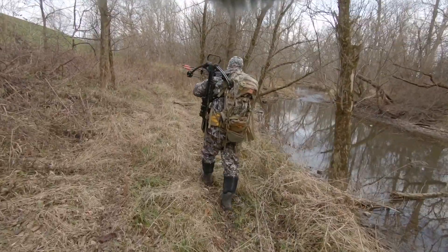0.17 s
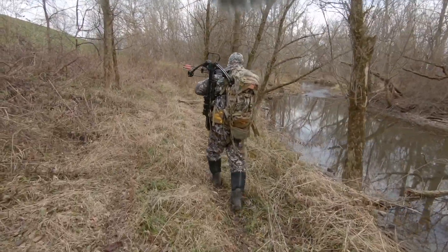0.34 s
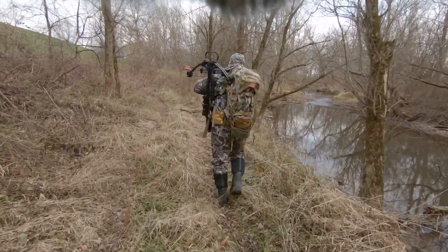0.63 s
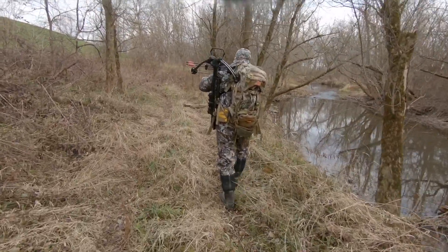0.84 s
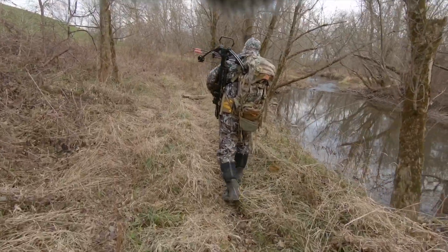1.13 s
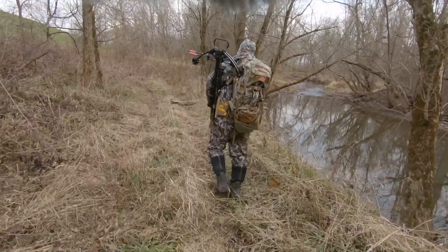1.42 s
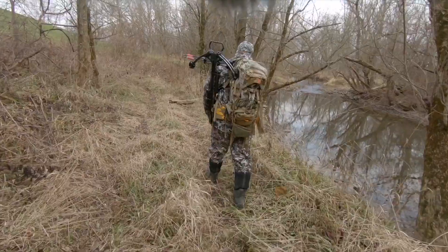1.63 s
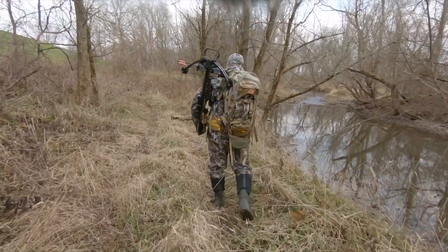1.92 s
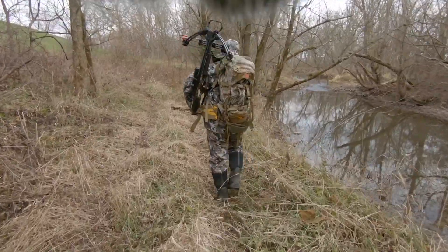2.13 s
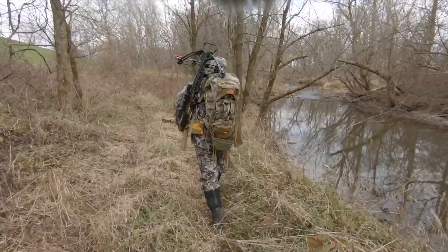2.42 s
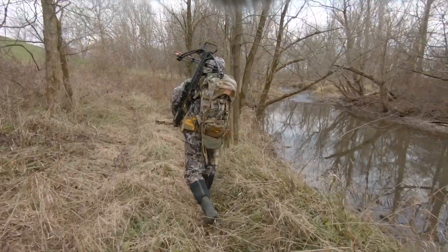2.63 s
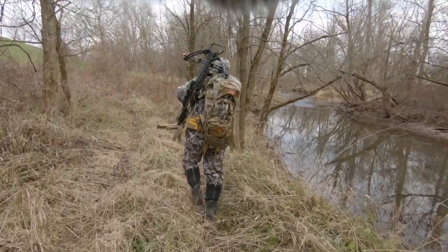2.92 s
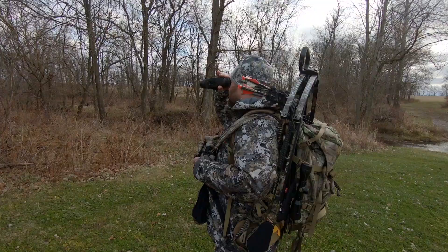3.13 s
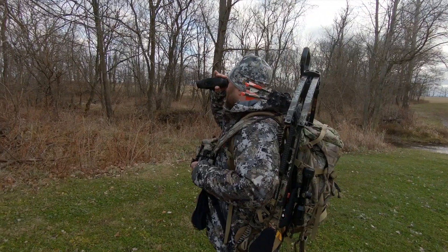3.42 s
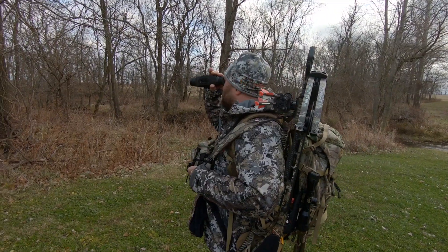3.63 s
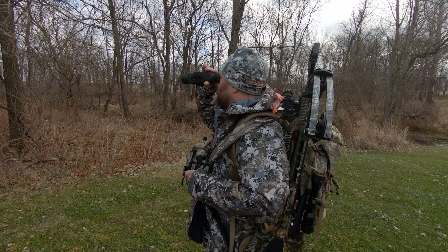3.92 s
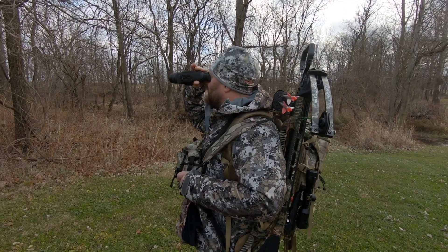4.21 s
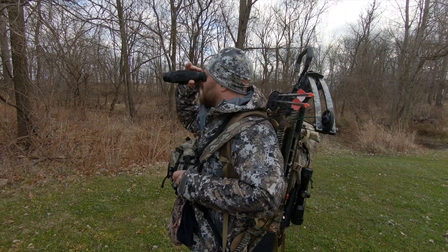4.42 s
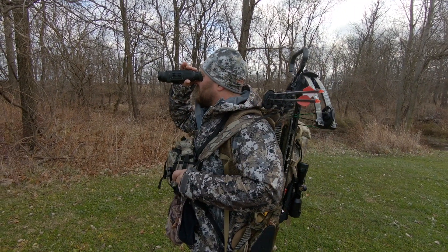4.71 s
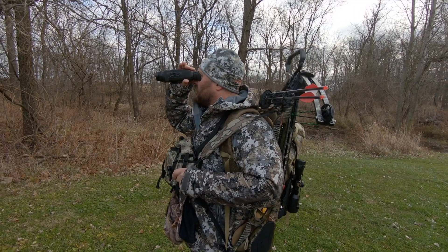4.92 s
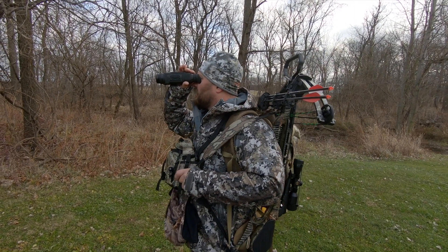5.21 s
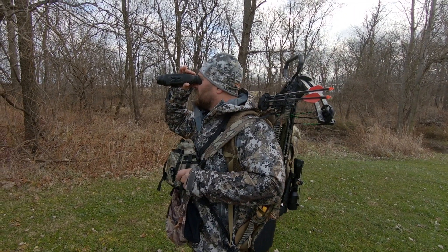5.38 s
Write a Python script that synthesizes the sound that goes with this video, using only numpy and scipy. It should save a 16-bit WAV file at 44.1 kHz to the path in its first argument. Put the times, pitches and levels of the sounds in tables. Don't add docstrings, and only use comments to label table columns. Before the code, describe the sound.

Boots crunch and swish unevenly through dry grass and leaf litter with snapping stems, then an abrupt change to a nearly silent outdoor lawn.

```python
import sys
import numpy as np
from scipy import signal
from scipy.fft import rfft, irfft, next_fast_len
from scipy.io import wavfile
from scipy.ndimage import uniform_filter1d

SR = 44100
rng = np.random.default_rng(int(sys.argv[2]) if len(sys.argv) > 2 else 0)


def volts_from_decibels(level):
    exponent = np.asarray(level, float) / 20
    return 10 ** exponent


def generate_wav(sig):
    pcm = np.round(np.clip(np.atleast_2d(sig).T, -1, 1) * 32767).astype(np.int16)
    wavfile.write(sys.argv[1], SR, pcm)


N = 244755
TIME = np.arange(N) / SR
CUT = 3.166


def noise():
    return rng.standard_normal(N)


def per_shot(walk, lawn):
    return np.where(TIME < CUT, walk, lawn)


def unit(x):
    return x / np.sqrt(np.mean(x ** 2) + 1e-20)


def smooth_field(shape, bins, frames):
    field = uniform_filter1d(rng.standard_normal(shape), bins, 0)
    return unit(uniform_filter1d(field, frames, 1))


def coloured(x, spectrum):
    m = next_fast_len(N + 8192)
    hz, db = np.transpose(spectrum)
    log_hz = np.log(np.fft.rfftfreq(m, 1 / SR) + .1)
    gain = volts_from_decibels(np.interp(log_hz, np.log(hz), db, left=-120, right=-120))
    return unit(irfft(rfft(x, m) * gain, m)[:N])


def patches(x, depth_db, bins, frames):
    z = signal.stft(x, nperseg=256)[2]
    gain = volts_from_decibels(depth_db * smooth_field(z.shape, bins, frames))
    return signal.istft(z * gain, nperseg=256)[1][:N]


# (frequency [Hz], level [dB])
HUSH_SPECTRUM = [(82, -63), (140, -11), (240, -9), (487, -13), (863, -13), (1330, -15), (1590, -22),
                 (15800, -34)]


def hush():
    return volts_from_decibels(-66.37) * coloured(patches(noise(), 0.09, bins=6, frames=30), HUSH_SPECTRUM)


# (frequency [Hz], level [dB])
PUSH_SPECTRUM = [(1.5, -0.5), (3, 9), (12, 4.5), (19, -20), (27, -28), (34, -39), (50, -46), (65, -74)]
# (time [s], level [dB])
GUSTS = [
    [(0.05, -28.5), (0.22, -40), (0.38, -31.5), (0.5, -26), (0.72, -24.5), (0.9, -30.5), (1.3, -26),
     (1.53, -37), (1.9, -24.5), (2.12, -29), (2.3, -35.5), (2.67, -30), (3.12, -32)],
    [(3.2, -37.5), (3.66, -45.5), (4.27, -44.5), (4.7, -45), (5.45, -45.5)],
]


def gusts():
    push_db = per_shot(*[np.interp(TIME, *np.transpose(shot)) for shot in GUSTS])
    flow = coloured(noise(), PUSH_SPECTRUM)
    power = uniform_filter1d(uniform_filter1d(flow ** 2, size=9000), size=9000)
    push = volts_from_decibels(push_db) * flow / np.sqrt(abs(power) + .05)
    return push * (1 - np.exp(-abs(TIME - CUT) / .06))


# (frequency [Hz], level [dB])
TRAFFIC_SPECTRUM = [(18, -38), (26, 8.5), (42, 1), (59, -7.5), (81, -4.5), (110, -5), (129, -13),
                    (240, -54)]
# (walk level [dB], lawn level [dB])
TRAFFIC_DB = (-60.5, -63.5)


def traffic():
    passing = patches(noise(), 1.56, bins=4, frames=80)
    return volts_from_decibels(per_shot(*TRAFFIC_DB) + 3.0) * coloured(passing, TRAFFIC_SPECTRUM)


def drone(hz, wander_hz):
    drift, sway = [coloured(noise(), [(.3, 0), (8, -6)]) for _ in range(2)]
    phase = 2 * np.pi * np.cumsum(hz + wander_hz * drift) / SR
    return volts_from_decibels(1 + 3.6 * sway) * np.sin(phase)


# (pitch [Hz], wander [Hz], walk level [dB], lawn level [dB])
ENGINES = [
    (67.7, 1.8, -64, -67),
    (106.4, 4.1, -68, -79),
    (87.2, 2.8, -76, -71),
    (217.3, 1.77, -88, -72.5),
    (868, 26, -79, -77.5),
]


def engines():
    return sum(volts_from_decibels(per_shot(*levels_db)) * drone(hz, wander_hz) for hz, wander_hz, *levels_db in ENGINES)


# (time [s], body level [dB], brighter parts over it [dB], ring [Hz])
CRACKS = [(0.0426, -48, -24, 3000), (0.0836, -44.5, -24, 1850), (0.3921, -45, -4, 2320),
          (0.396, -55, -12, 2480), (0.4522, -51, -1, 3050), (0.496, -49.5, -6, 1670),
          (0.789, -36.5, 1, 2800), (0.7925, -43.5, 2, 2430), (1.0042, -42, -3, 1800),
          (1.0777, -30.5, -4.5, 3130), (1.0792, -47, -5, 4800), (1.104, -48, -12, 2500),
          (1.1347, -48, -17, 3400), (1.0825, -42, -13, 3000), (1.093, -43, -20, 3100),
          (1.1073, -37.5, -8, 2900), (1.1163, -42, -14, 2680), (1.1318, -43, -10, 3170),
          (1.1382, -37, -2.5, 3100), (1.1434, -36, -11, 2470), (1.1492, -42, -12, 2860),
          (1.1535, -49, -1, 2800), (1.1976, -36.5, -6.5, 1850), (1.2247, -40, 0.5, 3130),
          (1.2766, -43.5, -3, 1880), (1.6928, -45, -14, 1900), (1.6966, -43.5, -6, 3640),
          (1.635, -58, -18, 1400), (2.585, -53, -12, 2000), (3.112, -57, -18, 2300),
          (2.1478, -47, -22, 2200), (2.2148, -41, -8, 4080), (2.184, -45, -6, 3000),
          (2.2226, -46.5, -8, 1980), (2.265, -43.5, -11, 3000), (2.2305, -43, -17, 3440),
          (2.2987, -47, -16, 1920), (2.3368, -47, 2, 2900), (2.6835, -44, -6, 4200),
          (2.2793, -46, -19, 2420), (2.6789, -39.5, -12, 2060)]
# (time [s], crack level [dB], sizzle over it [dB], ring [Hz])
TICKS = [(0.0721, -47.5, 8, 7400), (0.164, -54, 6, 9000), (0.3488, -45, -23, 6100),
         (0.403, -45.5, -8, 7100), (0.7892, -47, 7, 9700), (0.839, -52, -4, 7500), (1.195, -50, -1, 9000),
         (1.2198, -61, 2, 9000), (0.4907, -48, -1, 8400), (0.5595, -42, -9, 4870), (0.62, -55, 2, 8600),
         (0.652, -39.5, -14, 8000), (0.6984, -56, 8, 8000), (0.855, -48, -7, 9000), (0.9592, -41, 2, 8800),
         (1.024, -43, -11, 6750), (1.0633, -46, 0, 4600), (1.472, -54, -8, 8500), (1.67, -42.5, -20, 7300),
         (1.712, -46, -20, 6760), (1.853, -41, -25, 5200), (1.9613, -44, -3, 8200), (1.964, -48, -7, 7000),
         (2.1649, -42.5, 1, 7460), (1.588, -56.5, 12.5, 9000), (2.1919, -46, -8, 6700),
         (2.2161, -37, -17, 6800), (2.258, -46, -17, 7300), (2.2797, -43.5, -22, 7100),
         (2.6773, -41, -17, 7440), (2.6925, -37.5, -12, 7900), (2.699, -50, 0, 8200),
         (2.8031, -44, -14, 8200), (2.79, -53, -3, 8000), (2.605, -60, 8, 9000), (2.308, -49, -12, 5900),
         (3.012, -56, 4, 9000), (3.1645, -52.5, 4, 8950), (2.989, -42, -10, 7500), (1.2507, -49, -10, 8000)]
# (time [s], crack level [dB], sizzle over it [dB], ring [Hz])
FIDGETS = [
    (3.3268, -65, 3, 6040),
    (3.6068, -58.5, -10, 5550),
    (3.6719, -74, -1, 4500),
    (3.8659, -75, 1, 8000),
    (3.893, -75, 8, 8000),
    (4.4005, -76, 7, 8100),
    (4.4637, -74, -12, 6000),
]
# (lowest [Hz], highest [Hz])
BREAK_PARTS = [(1400, 4200), (4900, 9300), (9500, 15500)]


def snaps():
    out, t = np.zeros(N + SR), np.arange(SR // 25) / SR
    parts = [signal.butter(2, edges, "bandpass", fs=SR) for edges in BREAK_PARTS]
    # time, levels of body, crack and sizzle, ring, fade time (3.5 of these fall by 60 dB)
    breaks = [(s, db, db + up, db + up - 4.5, hz, .0065) for s, db, up, hz in CRACKS]
    breaks += [(s, db - 11, db, db + up, hz, .006) for s, db, up, hz in TICKS + FIDGETS]
    for s, *levels_db, hz, t60 in breaks:
        spike = np.exp(-t / 0.00064)
        splinters = volts_from_decibels(-13.5 - 60 * t / (3.5 * t60))
        jolt = (spike + splinters) * rng.standard_normal(len(t))
        jolt[:2] += [1.6, -.8]
        pole = np.exp((2j * np.pi * hz - 3000) / SR)
        ring = signal.lfilter([1, 0, -1], np.poly([pole, pole.conj()]).real, jolt)
        for part, db, sign in zip(parts, levels_db, (1, -1, 1)):
            sound = signal.lfilter(*part, jolt + 0.14 * ring)
            loudest = np.sqrt(uniform_filter1d(sound ** 2, size=66).max())
            out[round(s * SR) - 8:][:len(t)] += sign * volts_from_decibels(db + 4.5) * sound / loudest
    return out[:N]


def crackle(count, spread_db, life_s):
    when, size = rng.random((count, 2)).T
    kicks = np.bincount((when * N).astype(int), volts_from_decibels(-spread_db * np.log(1 - size)), N)
    return unit(signal.lfilter([1], [1, -np.exp(-1 / (life_s * SR))], kicks))


def litter(spectrum, breaks, grain, patchy_db):
    hiss = patches(noise(), patchy_db, bins=8, frames=10)
    grit = patches(breaks * noise(), 4, bins=10, frames=1)
    return coloured(np.sqrt(1 - grain) * unit(hiss) + np.sqrt(grain) * unit(grit), spectrum)


# (blade [dB], tip [dB], leaf [dB], stem [dB], soil [dB])
BED_DB = [
    (-60, -58, -90, -61.5, -64),
    (-91, -92, -94, -100, -76),
]


def strokes(rows, db_per_colour, offset_db, layer):
    t = np.arange(0, N / SR + .002, .001)
    s, db, half, colour = np.transpose(rows)[:, :, None]
    away = abs(t - s) / (half * np.where(t < s, 1, 0.83))
    shape = np.exp(-away ** 1.57)
    same_shot = (t < CUT) == (s < CUT)
    swell = volts_from_decibels(db + db_per_colour * colour + offset_db) * shape * same_shot
    bed = volts_from_decibels(np.where(t < CUT, BED_DB[0][layer], BED_DB[1][layer]))
    return np.interp(TIME, t, np.sqrt(bed ** 2 + np.sum(swell ** 2, axis=0)))


# (time [s], ring [Hz])
BEND = [(0.0, 7600), (0.09, 7850), (0.34, 6500), (0.47, 7700), (0.74, 7800), (0.77, 7300), (1.21, 6840),
        (1.37, 7800), (1.56, 7800), (1.72, 7040), (2.06, 7800), (2.23, 7200), (2.33, 7900), (2.37, 6650),
        (2.72, 7800), (2.98, 7800), (3.05, 6840), (3.16, 7300)]


def bent(x, spectrum):
    home_hz = 7700
    hz, t, z = signal.stft(x, SR, nperseg=256)
    slide = np.interp(t, *np.transpose(BEND), right=home_hz) / home_hz
    f, db = np.transpose(spectrum)
    log_hz = np.log((hz[:, None] + 1) / slide)
    gain = volts_from_decibels(np.interp(log_hz, np.log(f), db, left=-120, right=-120))
    return unit(signal.istft(z * gain, nperseg=256)[1][:N])


# (time [s], level [dB], half length [s], thin tips over blades [dB])
SWISHES = [(0.05, -48.5, 0.078, -10), (0.24, -46, 0.051, -1.5), (0.33, -45, 0.047, -8),
           (0.46, -52.5, 0.12, -3), (0.6, -47.5, 0.14, 0), (0.72, -49.5, 0.075, -1),
           (0.781, -46, 0.037, -1), (0.852, -49.5, 0.022, -2), (0.966, -57, .011, -3),
           (1.0, -44, 0.058, -2), (1.08, -53, 0.011, 11), (1.17, -60, 0.073, 3), (1.35, -48.5, 0.07, -4),
           (1.47, -44, 0.073, -4), (1.64, -50.5, 0.13, -3), (1.9, -50, 0.26, -4.5),
           (2.02, -45.5, 0.015, -16), (2.165, -47, 0.022, -2), (2.192, -44, .003, -6),
           (2.223, -46, 0.0043, -6), (2.299, -50, .002, -8), (2.23, -45, 0.069, -4),
           (2.427, -44.5, 0.092, -3), (2.6, -52, 0.14, -6), (2.691, -43.5, 0.031, -1.5),
           (2.93, -50, 0.23, -3.5), (3.064, -43.5, 0.033, -1), (3.14, -49, 0.08, -1),
           (3.25, -56, 0.033, -6), (3.57, -71, .07, -10), (3.7, -76, 0.79, -2), (3.987, -62.5, 0.049, -2),
           (4.027, -66, .018, -3)]
# (frequency [Hz], level [dB])
BLADES = [(5000, -22), (6600, -8.5), (8100, -3.5), (9000, -8), (9800, -15), (11500, -26)]
# (frequency [Hz], level [dB])
TIPS = [(9500, -25), (10700, -10.5), (11800, -5.5), (12700, -5.5), (13800, -5), (15000, -10), (17500, -13),
        (21000, -7)]
# (frequency [Hz], level [dB])
FLAT = [(3000, 0), (20000, 0)]


def swishes(fine):
    blade = strokes(SWISHES, 0, offset_db=-2.5, layer=0)
    tip = strokes(SWISHES, 1, offset_db=-1.2, layer=1)
    sweep = blade * bent(litter(FLAT, fine, grain=0.18, patchy_db=1.1), BLADES)
    return sweep + tip * bent(litter(FLAT, fine, grain=0.18, patchy_db=1.0), TIPS)


# (time [s], level [dB], half length [s], depth [leaves on top -1, soil below 1])
TREADS = [(0.05, -49.5, 0.058, -0.026), (0.27, -48, 0.096, -1.13), (0.47, -52, 0.52, -0.024),
          (0.58, -49.5, 0.038, -0.29), (0.68, -51, 0.21, -0.47), (0.775, -44.5, 0.049, 0.18),
          (0.852, -56, 0.02, 0.34), (0.995, -44, 0.065, -0.11), (1.081, -42.5, 0.02, -0.18),
          (1.144, -48, 0.076, -0.67), (1.21, -56, 0.034, -1.1), (1.35, -50.5, 0.11, -0.14),
          (1.47, -46.5, 0.093, -0.053), (1.6, -74, 0.075, 0.75), (1.69, -47, 0.17, -0.32),
          (1.92, -49, 0.15, 0.15), (2.09, -56.5, 0.061, 1), (2.19, -40, 0.006, -0.53),
          (2.2225, -41.5, 0.0065, -0.8), (2.703, -46.5, 0.0064, -0.079), (2.6785, -45, .003, -0.7),
          (2.225, -47.5, 0.13, -0.15), (2.425, -44, 0.072, -0.49), (2.6, -51, 0.14, -0.23),
          (2.691, -48, 0.056, -0.2), (2.93, -49.5, 0.2, -0.26), (3.066, -45, 0.052, -0.35),
          (3.14, -48.5, 0.092, -0.67), (3.25, -59.5, 0.086, -0.33), (3.57, -66.5, 0.11, 0.62),
          (3.66, -71, 0.3, 1), (3.987, -61.5, 0.062, 0), (4.027, -62, 0.024, -0.3), (4.3, -75, 0.32, 0.98)]
# (frequency [Hz], level [dB])
LEAVES = [(2800, -5.5), (4000, -5.5), (5000, -2), (6300, -0.5), (7300, -2.5), (10000, -5.5), (13000, -15.5)]
# (frequency [Hz], level [dB])
STEMS = [(600, -17.5), (1200, -2), (2000, 0), (3300, -1.5), (4500, -2), (7000, -18)]
# (frequency [Hz], level [dB])
SOIL = [(110, -5.5), (200, 0), (300, 0), (550, 3), (900, 1), (1600, -6)]


def treads(fine, coarse, clods):
    leaf = strokes(TREADS, -7, offset_db=-5.0, layer=2)
    stem = strokes(TREADS, 0, offset_db=-2.48, layer=3)
    soil = strokes(TREADS, 9, offset_db=-7.0, layer=4)
    crush = leaf * litter(LEAVES, fine, grain=0.27, patchy_db=3.0)
    crush += stem * litter(STEMS, coarse, grain=0.14, patchy_db=2.0)
    return crush + soil * litter(SOIL, clods, grain=0.26, patchy_db=2.5)


def rustle():
    shared = crackle(count=2500, spread_db=2.2, life_s=.0012)
    fine = shared + .5 * crackle(count=4000, spread_db=2.5, life_s=.0004)
    coarse = shared + 0.19 * crackle(count=1500, spread_db=3.5, life_s=0.0091)
    clods = 3.8 * shared + crackle(count=500, spread_db=0.5, life_s=0.00044)
    return swishes(fine) + treads(fine, coarse, clods)


# (time [s], level [dB], ring [Hz])
KNOCKS = [(0.054, -43, 516), (0.256, -44, 370), (0.393, -24, 590), (0.393, -41, 1110), (0.3954, -38, 890),
          (0.492, -39, 477), (0.748, -43, 800), (0.788, -44.5, 332), (0.956, -44, 280), (0.978, -50, 516),
          (1.003, -39, 770), (1.0627, -35, 780), (1.0888, -37, 550), (1.198, -31.5, 630), (1.225, -34, 950),
          (1.362, -46, 237), (1.4487, -51, 373), (1.8315, -41, 437), (1.8355, -48, 468), (1.836, -35, 1200),
          (1.8465, -40, 600), (1.786, -35.5, 1340), (1.7905, -39, 1350), (1.863, -39, 1400),
          (1.809, -40, 1160), (1.945, -43, 266), (1.965, -51, 450), (1.99, -44, 620), (2.0164, -39, 430),
          (2.065, -44, 263), (2.085, -37, 1310), (2.091, -46, 410), (2.117, -45, 640), (2.123, -46, 523),
          (2.131, -45.5, 238), (2.259, -36.5, 1020), (2.053, -33.5, 1540), (2.069, -43, 690),
          (2.0876, -43, 231), (2.0155, -46, 900), (2.143, -42.5, 950), (0.727, -52, 637), (1.259, -45, 920),
          (1.299, -45, 900), (1.365, -39.5, 894), (1.435, -46, 320), (3.112, -50, 430), (2.107, -42, 950),
          (2.1265, -41, 423), (2.1832, -33, 1070), (2.215, -39, 826), (2.2294, -34.5, 965),
          (2.3332, -42, 870), (2.7005, -46, 260), (0.78, -49, 169), (3.1635, -54, 300)]


def knocks():
    out, t = np.zeros(N + SR), np.arange(SR // 15) / SR
    onset = 1 - np.exp(-t / 0.00048)
    for s, db, hz in KNOCKS:
        grit = uniform_filter1d(rng.standard_normal(len(t)), size=14)
        grit -= uniform_filter1d(grit, size=80)
        puff = 0.42 * volts_from_decibels(-60 * t / 0.047) * grit
        ring = volts_from_decibels(-60 * t * hz / 8.04) * np.sin(2 * np.pi * hz * t)
        out[round(s * SR):][:len(t)] += volts_from_decibels(db + 4.0) * (ring + puff) * onset
    return out[:N]


# (frequency [Hz], level [dB])
SIDE_SPECTRUM = [(60, -21), (200, -21), (500, -19.5), (900, -26), (2000, -34.5), (16000, -51)]
# (time [s], half length [s], level [dB], centre [Hz], reach [Hz])
ASIDE = [
    (0.071, .006, -22, 10000, 5500),
    (0.289, 0.011, -10, 9000, 800),
    (0.559, .012, -27, 3000, 2500),
    (0.958, .008, -27, 8800, 700),
    (1.076, .006, -25, 9500, 6500),
    (1.142, .008, -25, 6500, 3500),
    (1.275, 0.01, -20, 7500, 6500),
    (3.056, 0.011, 3, 9400, 2500),
    (3.163, .008, -17, 6500, 6000),
]


def apart(x):
    hz, t, z = signal.stft(x, SR, nperseg=1024)
    field = smooth_field(z.shape, bins=4, frames=3)
    moments = uniform_filter1d(rng.standard_normal(len(t)), size=6) > -.15
    f, db = np.transpose(SIDE_SPECTRUM)
    side_db = np.interp(np.log(hz + 1), np.log(f), db)[:, None]
    gain = volts_from_decibels(side_db + 7 * field - 5) * moments
    for s, half, db, centre, reach in ASIDE:
        gain += volts_from_decibels(db) * (abs(hz - centre) < reach)[:, None] * np.exp(-((t - s) / half) ** 2)
    scatter = np.exp(2j * np.pi * rng.random(z.shape))
    return signal.istft(z * gain * scatter, nperseg=1024)[1][:N]


# (time [s], level [dB], pitch [Hz])
THUDS = [(0.441, -26, 17), (0.54, -31, 17), (1.256, -40.5, 45), (1.332, -28, 21), (1.44, -46, 39),
         (1.72, -58, 33), (1.839, -35, 21), (1.952, -31, 12.9), (2.72, -37, 24), (3.05, -46.5, 29),
         (4.3, -45, 24)]


def thuds():
    out = np.zeros(N)
    for s, db, hz in THUDS:
        t = TIME - s
        out += volts_from_decibels(db) * np.exp(-(t * hz * 1.2) ** 2) * np.sin(2 * np.pi * hz * t)
    return out


# (time [s], level [dB], rise [s], rebound [s])
SWELLS = [
    (2.6808, -37.5, 0.015, 0.0042),
    (3.1667, -38, 0.028, 0.00083),
    (5.55, -40.5, 0.034, 0.0006),
]


def swells():
    out = np.zeros(N)
    for s, db, rise, back in SWELLS:
        shape = np.exp(-abs(TIME - s) / np.where(TIME < s, rise, back))
        out += volts_from_decibels(db) * shape * np.tanh(4 * (s - TIME) / back)
    return out


# (time [s], length [s], level [dB])
BIRD = (5.2, 0.14, -78)


def bird():
    s, length, db = BIRD
    t = TIME - s
    voice = coloured(noise(), [(6200, -30), (7000, -6.5), (8000, -5), (8800, -18.0)])
    pulses = 1 + 0.65 * np.sin(2 * np.pi * 35 * t + 9 * np.sin(21 * t))
    return volts_from_decibels(db - 8 * abs(t) / length) * (t > 0) * (t < length) * pulses * voice


def scene():
    near = hush() + snaps() + rustle()
    air = gusts() + traffic() + engines() + swells()
    mid = near + air + knocks() + thuds() + bird()
    side = apart(near)
    return np.array([mid + side, mid - side])


def band_limit(x):
    return signal.sosfilt(signal.butter(12, 16810, fs=SR, output="sos"), x)


def record(dry):
    hz = np.fft.rfftfreq(N, 1 / SR)
    over = np.clip((hz - 15750) / 250, 0, 1)
    mix = irfft(rfft(dry) * volts_from_decibels(-42 * over), N)
    return band_limit(mix)


dry = scene()
out = record(dry)
generate_wav(out)
```